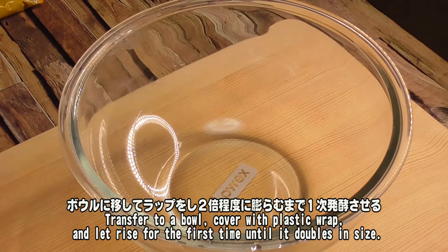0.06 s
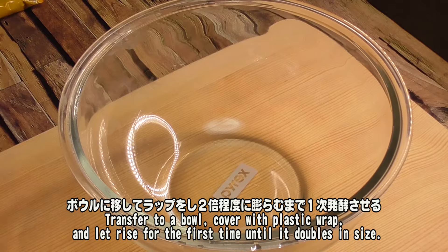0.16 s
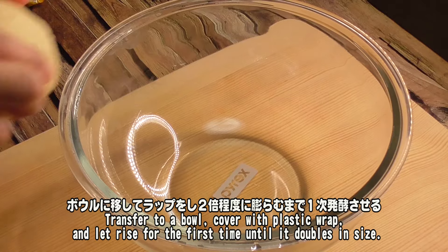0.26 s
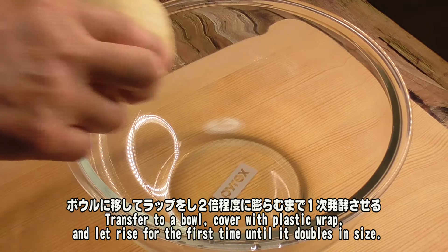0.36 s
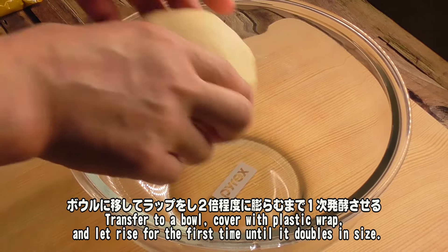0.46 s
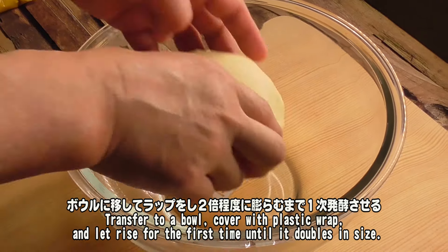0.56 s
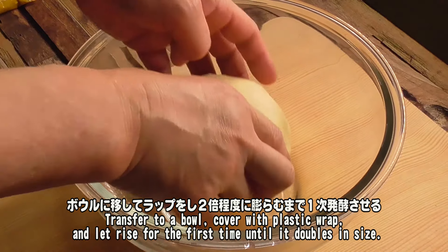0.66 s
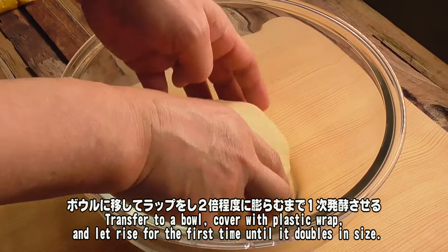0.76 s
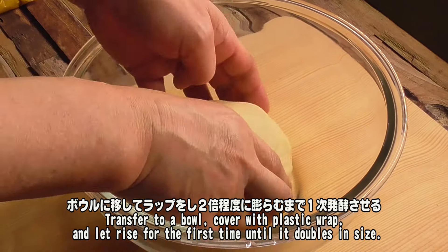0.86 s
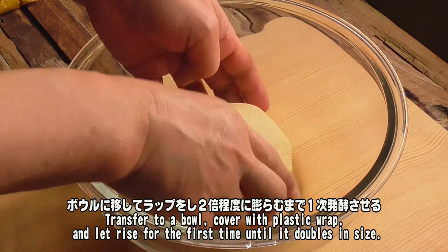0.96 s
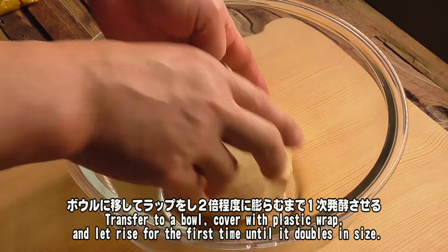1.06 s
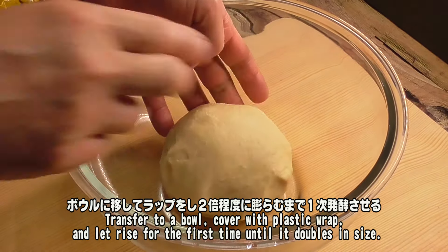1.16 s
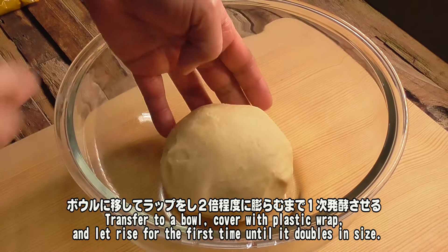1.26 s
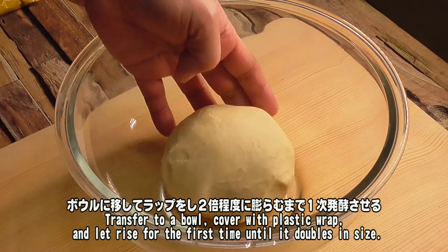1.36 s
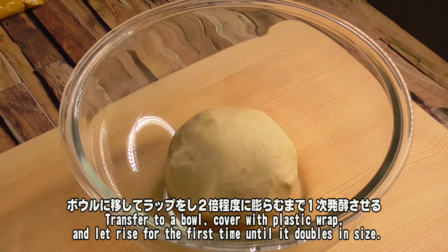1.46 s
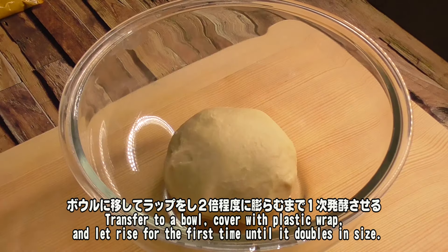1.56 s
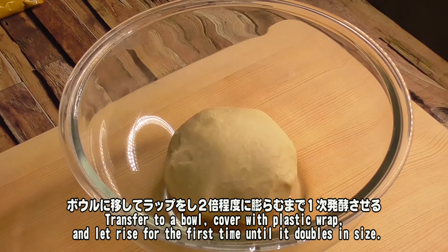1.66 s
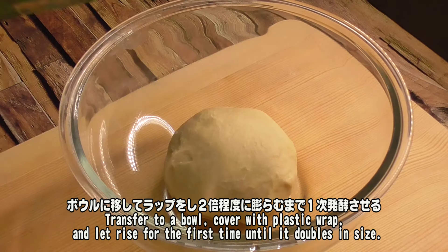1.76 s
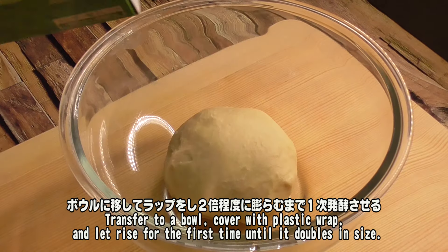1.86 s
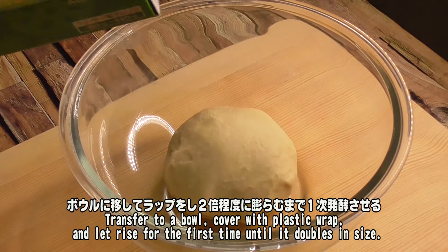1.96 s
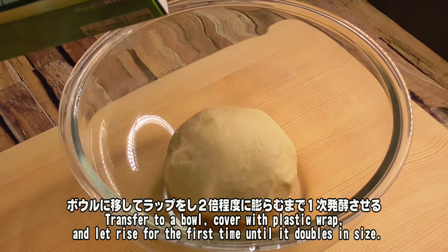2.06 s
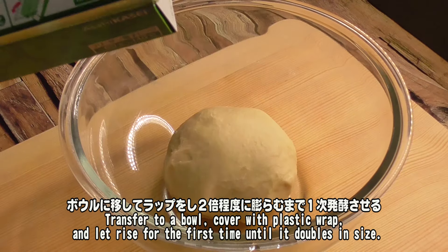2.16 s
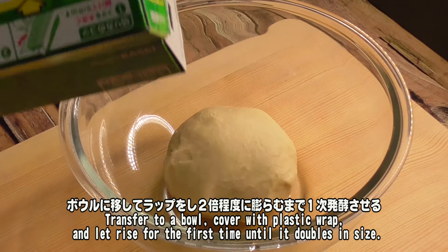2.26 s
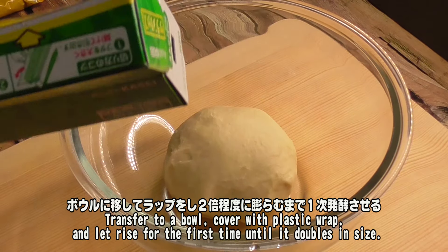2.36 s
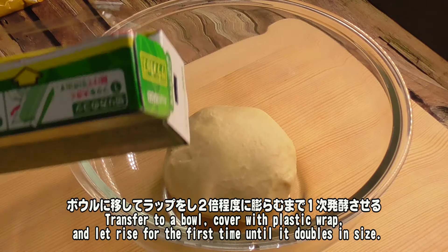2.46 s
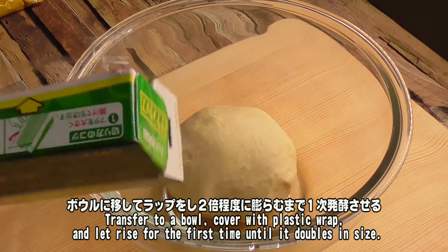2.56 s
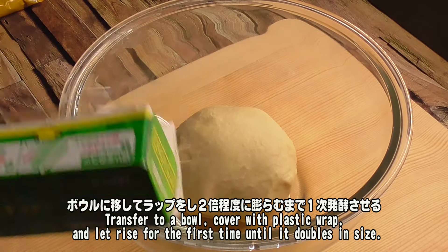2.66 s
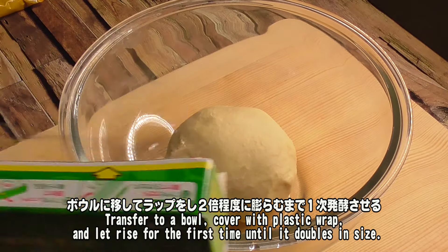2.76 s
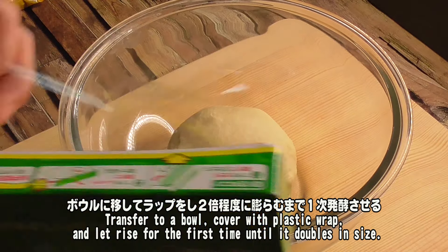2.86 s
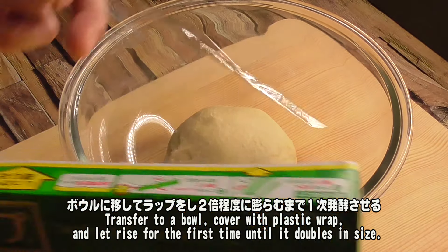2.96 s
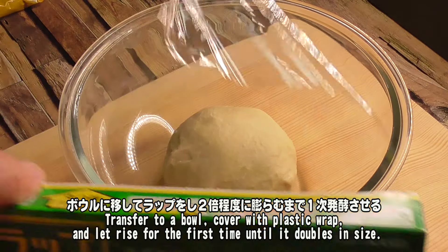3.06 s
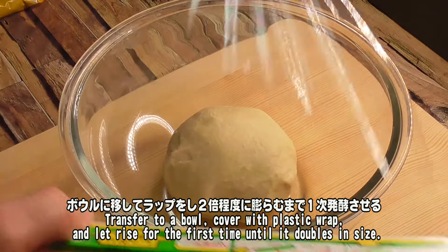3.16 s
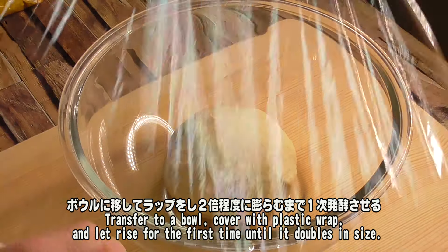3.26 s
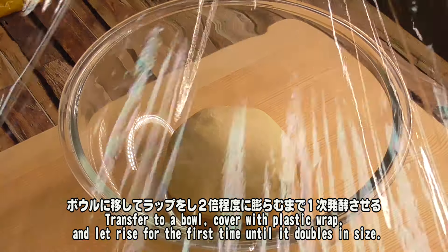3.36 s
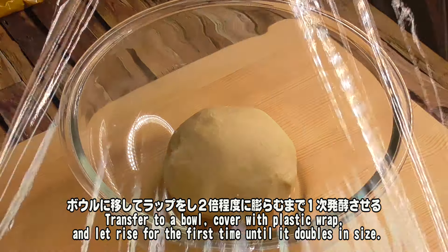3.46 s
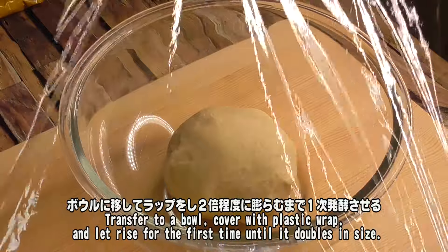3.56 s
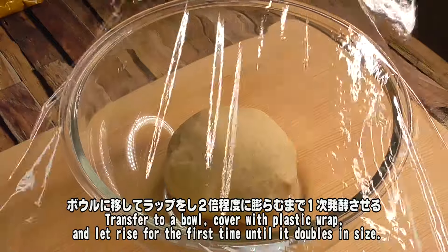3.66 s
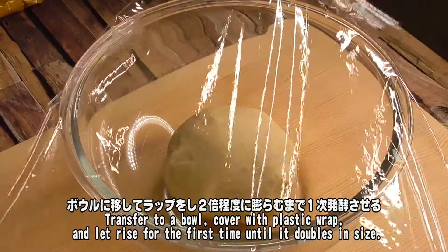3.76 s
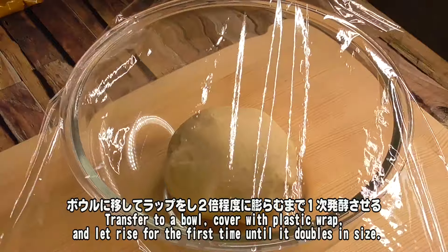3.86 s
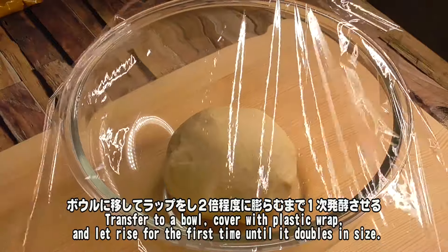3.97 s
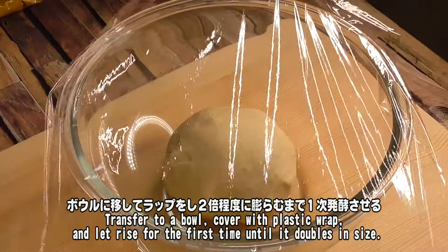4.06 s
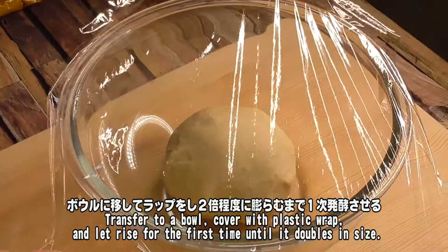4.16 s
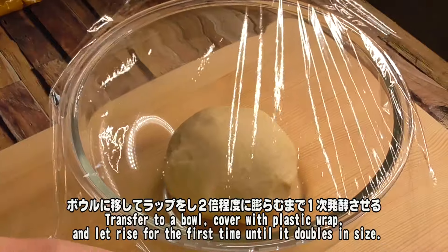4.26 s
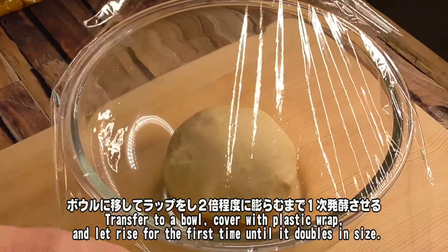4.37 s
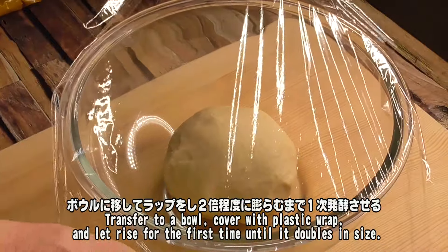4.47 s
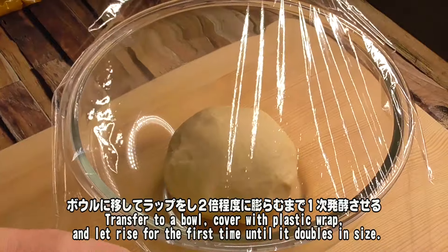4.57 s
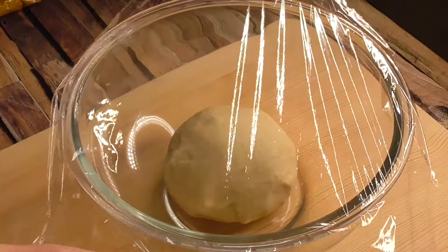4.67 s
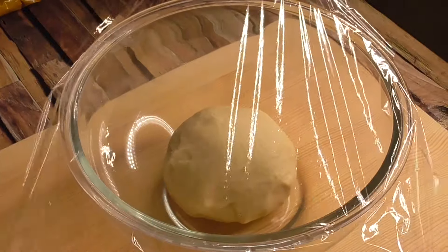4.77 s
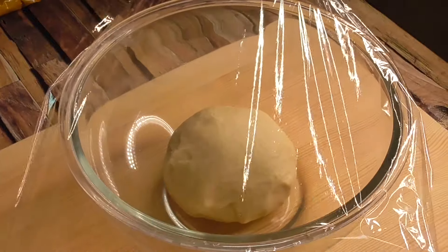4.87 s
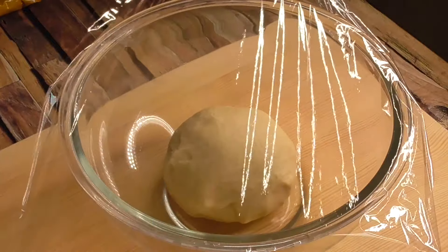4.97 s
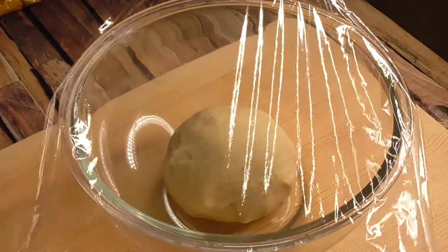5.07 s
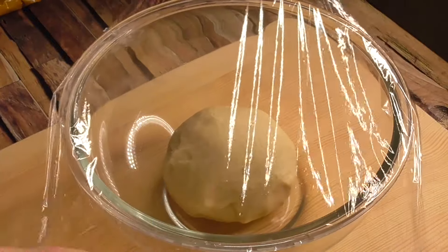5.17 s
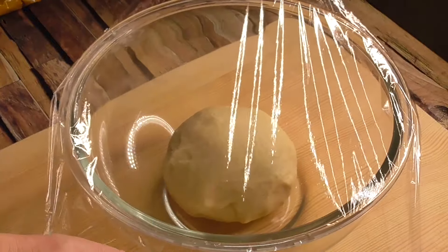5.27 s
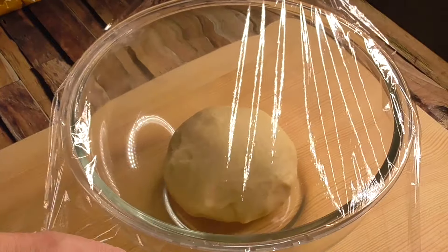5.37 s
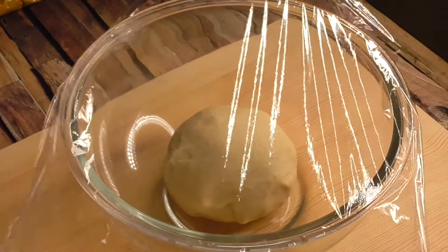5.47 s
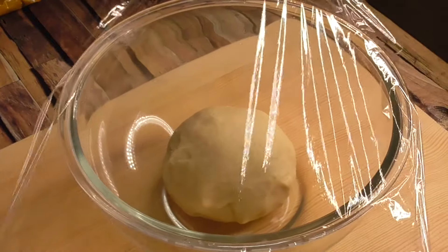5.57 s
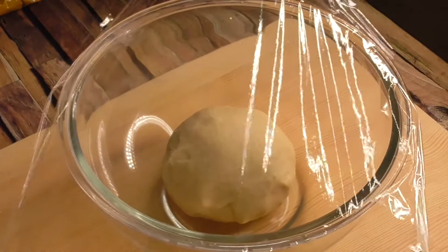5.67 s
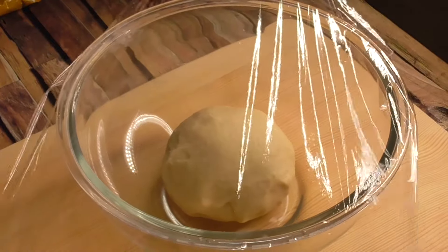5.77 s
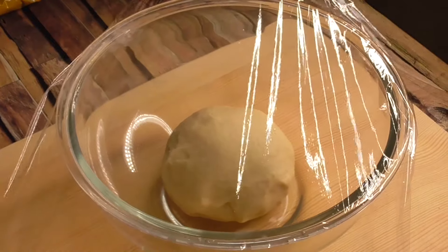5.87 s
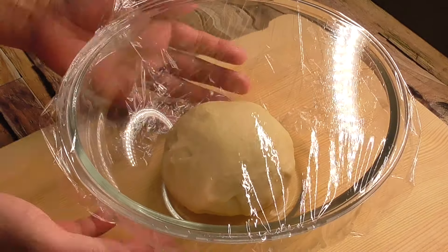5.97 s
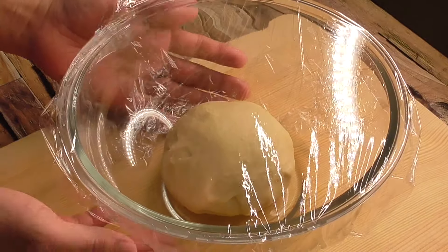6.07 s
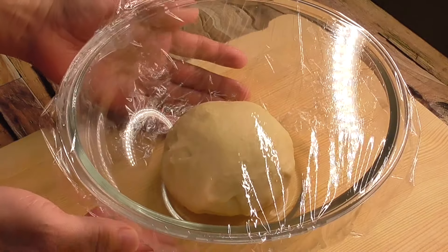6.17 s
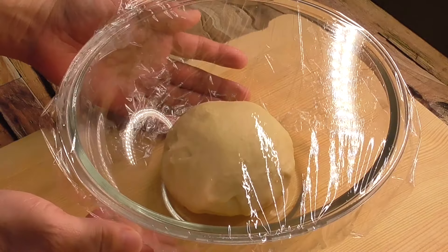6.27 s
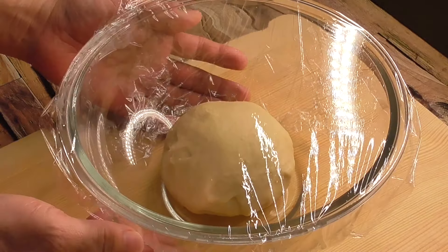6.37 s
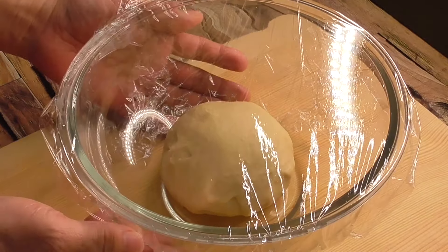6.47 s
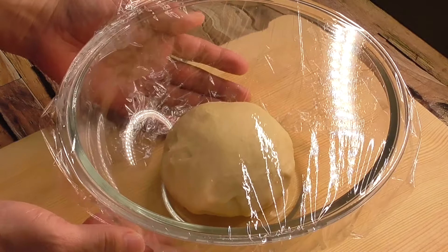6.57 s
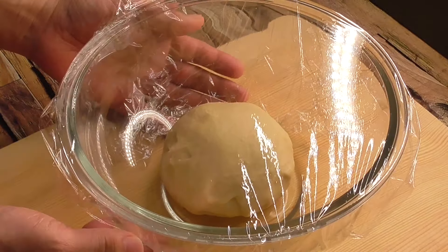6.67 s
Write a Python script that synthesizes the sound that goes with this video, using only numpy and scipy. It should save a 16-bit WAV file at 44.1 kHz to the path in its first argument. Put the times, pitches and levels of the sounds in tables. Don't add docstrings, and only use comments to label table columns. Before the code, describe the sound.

In a quiet kitchen, a faint motor tick, then cling film crackles off a cardboard box and snaps tight over a glass bowl.

```python
import sys
import numpy as np
from scipy import signal
from scipy.io import wavfile

SR = 44100
rng = np.random.default_rng(int(sys.argv[2]) if len(sys.argv) > 2 else 0)


def how_loud(loudness_db):
    steps = np.asarray(loudness_db, float) / 20
    return 10 ** steps


def master(y):
    cut = np.clip(np.atleast_2d(y).T, -1, 1)
    pcm = np.round(cut * 32767)
    wavfile.write(sys.argv[1], SR, pcm.astype(np.int16))


N = 296098
PRESSED_FROM_S = 3.58

# centre f/Hz, width f/Hz, level/dB
HOLLOW = [(775, 315, -1), (980, 79.9, 1), (1156, 402, 2.5), (1589.6, 454, 0.5), (2278.3, 83, -8)]
# centre f/Hz, width f/Hz, level/dB
BOARD = [(150, 60, -5), (280, 212.7, 3), (380, 38, 3), (425.2, 123, 1.5), (651.6, 109, 0.5)]


def rms_one(x):
    return x / np.sqrt(np.mean(x ** 2) + 1e-20)


def in_time(rows):
    s, *columns = np.transpose(rows)
    return [np.interp(np.arange(N) / SR, s, c) for c in columns]


def at_hz(points, hz):
    f, value = np.array(points).T
    return np.interp(np.log(hz), np.log(f), value)


def drift(rate_hz):
    r = np.exp(-80 * np.pi * rate_hz / SR)
    noise = rng.standard_normal(N // 40 + 2002)
    slow = signal.lfilter([1], [1, -2 * r, r * r], noise)[2000:]
    return np.interp(np.arange(N) / 40, np.arange(len(slow)), rms_one(slow))


def bandpass(x, low_hz, high_hz):
    return signal.sosfilt(signal.butter(2, [low_hz, high_hz], "band", fs=SR, output="sos"), x)


def resonance(x, hz, width_hz):
    r = np.exp(-np.pi * width_hz / SR)
    gain = (1 - r * r) / 2
    return signal.lfilter([gain, 0, -gain], [1, -2 * r * np.cos(2 * np.pi * hz / SR), r * r], x + 1e-18)


def body(x, modes):
    out = 0
    for k, (hz, width_hz, db) in enumerate(modes):
        out = out + (-1) ** k * how_loud(db) / np.sqrt(width_hz) * resonance(x, hz, width_hz)
    return out


def sides(pan_db):
    return how_loud(np.array([pan_db, -pan_db]) / 2)


def clicks(per_s, size_db, clump_db, spread_db):
    per_s = np.clip(per_s, 100, SR / 2)
    sizes = how_loud(size_db * np.minimum(rng.exponential(1, N), 5)) * rng.choice([-1, 1], N)
    born = rng.random(N) < per_s * how_loud(clump_db * drift(25)) / SR
    return sides(spread_db * rng.standard_normal(N)) * rms_one(sizes) * born * np.sqrt(SR / per_s)


def spaced(x, lag):
    at = np.flatnonzero(x[1])
    right = np.zeros(N)
    np.add.at(right, np.clip(at + np.round(lag[at]).astype(int), 0, N - 1), x[1, at])
    return np.array([x[0], right])


def add(out, s, sound):
    i = round(s * SR)
    out[:, i:i + sound.shape[1]] += sound[:, :N - i]


def gestures(rows, rest_db):
    t, power = np.arange(N) / SR, how_loud(2 * rest_db)
    for s, swell, hold, level_db, fade in rows:
        fading = np.maximum(t - s - swell - hold, 0) / fade
        rise = np.clip((t - s) / swell, 0, 1)
        power = power + (rise * how_loud(level_db - 20 * fading)) ** 2
    return 10 * np.log10(power)


def hum():
    # f/Hz, level/dB
    hum_tone = [(12, -56), (20, -22), (139, -7.5), (179, -3), (237, -10), (281, -2), (323, -13.5),
                (479, -11), (652, -14), (863, -11.5), (2060, -25.5), (2510, -25.5), (6170, -26.5),
                (15200, -24), (16500, -46)]
    # f/Hz, correlation
    likeness = [(60, 0.47), (240, 0.366), (950, 0.087), (3770, 0.14), (15000, 0.052)]
    out, edges = 0, 20 * 2 ** np.arange(0, 10, .4)
    white = rng.standard_normal((2, 2, N))
    for k, (low, high) in enumerate(zip(edges, edges[1:])):
        mid, side = bandpass(white[k % 2], low, min(high, .45 * SR))
        hz = np.sqrt(low * high)
        alike = np.clip(at_hz(likeness, hz), -1, 1)
        stereo = np.sqrt(1 + alike) * mid + np.sqrt(1 - alike) * side * [[1], [-1]]
        out = out + how_loud(at_hz(hum_tone, hz)) * stereo
    return how_loud(-57.5) * rms_one(out)


def motor():
    # t/s, level/dB
    motor_level = [
        (.54, -81.5),
        (.6, -67.5),
        (.72, -67),
        (.9, -69.5),
        (1.1, -70.5),
        (1.33, -67.5),
        (1.46, -73),
        (1.47, -95),
    ]
    # centre f/Hz, width f/Hz, level/dB
    housing = [(2330, 620, 3), (3930, 166, 0.5), (4750, 310, -3.5), (5800, 300, -23.5)]
    steps_per_s, first_s = 59.9, .5502
    at = np.arange(first_s, motor_level[-1][0], 1 / steps_per_s)
    steps = np.zeros(N)
    steps[(at * SR).astype(int)] = how_loud(2.0 * rng.standard_normal(len(at)))
    decay = np.exp(-1 / (0.0061 * SR))
    scratch = signal.lfilter([1], [1, -decay], steps + 1e-18) * rng.standard_normal((2, N))
    whine = 0.24 * resonance(rng.standard_normal(N), 3920, 140)
    started = steps.cumsum() > 0
    ring = rms_one(body(scratch[0] + 0.58 * scratch, housing)) + 5.7 * whine * started
    return how_loud(in_time(motor_level)[0] - 6.0) * rms_one(ring)


def kitchen(x):
    # band f/Hz, t60/s, level/dB
    echoes = [(199.2, 0.285, -17.5), (508.2, 0.1794, -10.5), (1200, 0.456, -14), (2227, 0.533, -16.5),
              (5000, .3, -16), (11000, .2, -20)]
    t, tail = np.arange(SR // 2) / SR, 0
    for hz, t60, level_db in echoes:
        shared, own = rng.standard_normal(len(t)), rng.standard_normal((2, len(t)))
        noise = bandpass(2.072 * shared + 1.768 * own, hz / 1.585, hz * 1.762)
        dying = how_loud(-60 * t / t60) * np.clip(t / 0.001258 - 1, 0, 1)
        tail = tail + how_loud(level_db) * noise * dying / np.sqrt(np.sum(dying ** 2))
    return signal.fftconvolve(x.mean(axis=0)[None], tail, axes=1)[:, :N]


def rustle(modes, level_db, per_s, flicker_db):
    train = clicks(np.full(N, per_s), size_db=2.5, clump_db=2.0, spread_db=3.0)
    return how_loud(level_db + flicker_db * drift(18.2)) * rms_one(body(body(train, modes), modes))


def board_rumble(grip_db):
    return rustle(BOARD, -52.5 + 0.689 * (grip_db + 49.5), per_s=1500, flicker_db=2.0)


def box_boom(grip_db):
    # centre f/Hz, width f/Hz, level/dB
    belly = [(126.2, 71, 0.5), (180.1, 62, -2.5)]
    held = np.clip((PRESSED_FROM_S - np.arange(N) / SR) / .05, 0, 1)
    return held * rustle(belly, -58 + .55 * (grip_db + 50), per_s=600, flicker_db=3.0)


def hollow_rustle(grip_db):
    return rustle(HOLLOW, grip_db, per_s=4000, flicker_db=1.5)


def knocks():
    # t/s, peak level/dB, pitch f/Hz
    hollow_knocks = [(1.4961, -17.5, 1276), (1.5117, -24, 1130), (1.954, -23.5, 973), (2.33, -15.5, 2224),
                     (2.33, -18.5, 1133), (2.6272, -25, 1461), (2.6804, -26.5, 994), (2.7188, -11.5, 982.5),
                     (2.8346, -28, 875), (2.9932, -20, 1278), (3.0521, -11, 993.7), (3.5802, -33, 1068),
                     (3.6721, -31.5, 830), (3.78, -32.5, 734), (4.4674, -31, 991), (4.605, -36, 1410),
                     (4.6255, -22.5, 878.6), (4.9339, -30, 1272), (4.989, -30.5, 1178), (5.0065, -25, 1212),
                     (5.0337, -30.5, 1026), (5.066, -22.5, 1321), (5.1307, -31, 640.4), (5.5233, -36, 983),
                     (5.5929, -12.5, 980), (5.6606, -22.5, 957), (5.794, -13, 1246), (5.8446, -22.5, 1021),
                     (5.9126, -20.5, 1279)]
    # t/s, peak level/dB, pitch f/Hz
    thuds = [(1.9664, -36, 390), (2.1001, -39, 130), (2.1816, -36.5, 280), (2.3331, -25, 330),
             (2.6303, -32.5, 315), (2.6802, -32.5, 315), (2.718, -25.5, 450), (2.7677, -27, 380),
             (2.947, -34.5, 346), (2.9974, -25.5, 413), (3.171, -32.5, 313), (4.6275, -31.5, 392),
             (4.8434, -36, 459), (5.0072, -30, 426), (5.0671, -34, 427), (5.5883, -26.5, 310),
             (5.7928, -23.5, 280), (5.9114, -19.5, 291.7)]
    # t/s, peak level/dB, pitch f/Hz, ring t60/s
    bumps = [(.128, -44.5, 828, .02), (0.141, -54.5, 71, 0.076), (.84, -43.5, 620, 0.049),
             (0.848, -60, 70, 0.079), (1.47, -33.5, 682, 0.0074), (1.491, -44.5, 127, 0.085),
             (1.709, -32, 1930, 0.0126), (1.954, -26.5, 2140, 0.026), (2.014, -31, 251.6, 0.06),
             (2.035, -36, 280, 0.042), (2.096, -35, 1956, 0.022), (2.335, -27, 1200, 0.52),
             (2.33, -22.5, 4384, .1), (2.334, -30.5, 2253, .3), (4.83, -42, 328, 0.041),
             (4.999, -49.5, 91.3, 0.089), (2.969, -46.5, 66, 0.22), (5.589, -46.5, 92.5, 0.024),
             (5.794, -39.5, 80.4, 0.032), (5.919, -46, 65.7, 0.19)]
    knock_cycles, thud_cycles = 28.2, 12.8
    rows = [(s, db, hz, knock_cycles / hz) for s, db, hz in hollow_knocks]
    rows += [(s, db, hz, thud_cycles / hz) for s, db, hz in thuds]
    rows += bumps
    out, t = np.zeros((2, N)), np.arange(6000) / SR
    for s, peak_db, hz, t60 in rows:
        blow = rng.standard_normal(len(t)) * np.exp(-t * hz / 1.9)
        blow = bandpass(blow, 0.584 * hz, 1.716 * hz)
        own = rms_one(resonance(blow, hz, 1.793 / max(t60, .004)))
        stirred = rms_one(body(blow, HOLLOW + BOARD))
        knock = own + .5 * stirred + 0.856 * rms_one(blow)
        add(out, s, np.ones((2, 1)) * how_loud(peak_db) * knock / np.abs(knock).max())
    return out


def crackle(per_s):
    # f/Hz, level/dB
    film_tone = [(1000, -38), (1700, -11.5), (2560, -17), (4750, -6), (5800, -13.5), (8810, -7),
                 (10800, -15), (15000, -15.5), (16000, -87), (16500, -46)]
    train = clicks(per_s, size_db=2.2, clump_db=1.5, spread_db=4.0)
    train = spaced(train, 1.2 * rng.standard_normal(N))
    patch = rng.integers(0, 16, N // 2 + 1).repeat(2)[:N]
    out = 0
    for k, hz in enumerate(np.geomspace(1900, 15000, num=16)):
        patchy = how_loud(at_hz(film_tone, hz) + 1.5 * drift(5.14) + 0.58 * drift(22.5))
        out = out + patchy * resonance(train * (patch == k), hz, 0.126 * hz)
    return rms_one(out)


def film(tilt_db):
    # start t/s, swell t/s, hold t/s, crackle level/dB, 20 dB fade t/s
    pulls = [(-.05, 0.174, .005, -55.5, 0.02), (1.468, .003, 0.00196, -40, 0.0552),
             (1.47, 0.031, 0.173, -50.5, 0.19), (1.64, 0.0915, 0.0048, -46, 0.1825),
             (1.948, 0.0051, 0.00203, -41.5, 0.2636), (2.327, .005, 0.0021, -41.5, 0.35),
             (2.468, 0.0492, 0.088, -38.5, 0.14), (2.66, 0.023, 0.062, -53.5, 0.84),
             (2.06, 0.037, 0.101, -53.5, 0.31), (2.822, 0.0107, .007, -34, .012),
             (2.83, .05, .03, -45, 0.48), (2.92, 0.1925, 0.4265, -34.5, 0.1108)]
    # start t/s, swell t/s, hold t/s, level/dB, 20 dB fade t/s
    presses = [(3.621, 0.1664, 0.0047, -44.5, 0.235), (3.897, 0.2275, 0.0051, -48.5, 0.21),
               (4.199, 0.083, 0.0049, -51, 0.32), (4.457, 0.0078, 0.094, -51, 0.35),
               (4.591, 0.046, .005, -45, .25), (4.779, 0.0477, 0.0043, -41, 0.0961),
               (4.896, 0.032, 0.0046, -39, .14), (4.975, 0.0343, 0.0052, -37.5, 0.255),
               (5.303, 0.111, 0.125, -60, 0.07), (5.53, .05, .005, -43, 0.2373),
               (5.573, .022, 0.1406, -35, .25), (5.84, .006, .05, -35.5, .15),
               (6.038, 0.0303, 0.0046, -44.5, 0.1245), (6.14, 0.033, 0.109, -54, 0.2963),
               (6.25, 0.0983, 0.0046, -47, 0.1618), (6.667, .024, .002, -54.5, -0.17)]
    level_db = gestures(pulls + presses, rest_db=-74)
    x = crackle(per_s=6000 * how_loud(.8 * (level_db + 50)))
    lone = clicks(np.full(N, 260.), size_db=3.5, clump_db=4.0, spread_db=3.0)
    lone = bandpass(lone + 1e-18, 3500, 11000)
    pressed = np.arange(N) > PRESSED_FROM_S * SR
    x = x + 0.409 * rms_one(lone) * pressed
    low = signal.sosfilt(signal.butter(2, 7000, fs=SR, output="sos"), x)
    return how_loud(level_db) * (low + how_loud(tilt_db) * (x - low))


def snaps():
    # t/s, peak level/dB, centre f/Hz
    crease_snaps = [(.1285, -41.5, 5500), (.843, -34.5, 4180), (1.471, -37.5, 5950), (1.955, -20.5, 6430),
                    (2.2343, -34.5, 8730), (2.3285, -15.5, 5360), (2.3321, -11.5, 4960), (2.4847, -25, 3940),
                    (2.4918, -27, 4140), (2.6296, -28.5, 3100), (2.717, -34, 2570), (6.337, -37, 4400),
                    (2.822, -25.5, 6180), (2.991, -23, 3780), (6.0684, -32.5, 4260), (6.0773, -30.5, 4180),
                    (6.1682, -30.5, 7380), (6.684, -32.5, 5060),
                    (3.7433, -28.5, 6500), (3.7486, -30, 4920), (3.9859, -30.5, 7560), (4.0656, -31.5, 7420),
                   (4.0783, -30, 8050), (4.1386, -29, 4830), (4.1869, -31.5, 8050), (4.2309, -27, 10240),
                   (4.244, -31.5, 10750), (4.2801, -26, 8200), (4.2867, -24.5, 8640), (4.3244, -28.5, 8700),
                   (4.3633, -32.5, 9330), (4.4677, -23, 9300), (4.5242, -29, 4410), (4.536, -25.5, 6480),
                   (4.6045, -22, 7800), (4.6268, -16.5, 7240), (4.6939, -21, 7980), (4.8186, -31.5, 6210),
                   (4.8288, -25.5, 6810), (4.8392, -31, 6970), (4.914, -25, 5220)]
    # t/s, peak level/dB
    rim_snaps = [(4.923, -21), (4.934, -12.5), (4.9876, -13.5), (4.9983, -15.5), (5.005, -11),
                 (5.0661, -10.5), (5.1404, -25), (5.1749, -24), (5.199, -27), (5.247, -24.5),
                 (5.2847, -30.5), (5.469, -28), (5.4867, -31), (5.5254, -12.5), (5.548, -20.5),
                 (5.5868, -5), (5.5934, -6.5), (5.702, -23), (5.7154, -14), (5.7274, -15.5), (5.737, -23.5),
                 (5.742, -18.5), (5.7569, -15.5), (5.7767, -18), (5.7891, -19), (5.7931, -6),
                 (5.8236, -15.5), (5.8457, -16), (5.858, -16), (5.9052, -13)]
    rim_hz, rim_scatter = 7800, 0.068
    rows = crease_snaps
    rows = rows + [(s, db, rim_hz * np.exp(rim_scatter * rng.standard_normal())) for s, db in rim_snaps]
    out, t = np.zeros((2, N)), np.arange(700) / SR
    for s, peak_db, hz in rows:
        noise = rng.standard_normal((3, len(t)))
        fold = t / (.00042 * how_loud(.32 * (peak_db + 30)))
        rattle = noise[0] + 0.41 * noise[1:]
        burst = rattle * np.sqrt(fold) * np.exp(-fold)
        snap = 0.267 * bandpass(burst, 2300, 13000) + 2.63 * resonance(burst, hz, 0.455 * hz)
        add(out, s - .0003, how_loud(peak_db) * snap / np.abs(snap.mean(axis=0)).max())
    return out


def scene():
    # t/s, film tightness as top-octave tilt level/dB, pan L-R level/dB
    hands = [(0, 0.5, -.5), (1.46, -3, .2), (1.48, 0, 4.5), (1.62, -0.15, 1), (2.1, -2, 1.04),
             (2.5, -2.5, 1.1), (2.75, 4.5, 2.5), (2.86, -2.5, 1.45), (3.1, 2.5, 0.77), (3.52, -1.5, 0.14),
             (4.45, 1, .2), (5.3, 3, 0.5), (5.6, 3, -0.1), (6.07, -1.5, 1.24), (6.72, -0.4, .3)]
    # start t/s, swell t/s, hold t/s, level/dB, 20 dB fade t/s
    grips = [(1.468, .003, 0.0173, -41.5, 0.0348), (1.49, 0.0079, 0.0078, -38.5, 0.17),
             (1.67, 0.0735, .005, -49.5, 0.1358), (1.948, 0.0066, .002, -43, 0.16),
             (2.226, 0.0083, .005, -53.5, 0.01), (2.327, .005, 0.0019, -37, 0.1577),
             (2.468, 0.056, .005, -45, 0.4743), (2.68, .048, 0.0049, -40, 0.17),
             (2.9, 0.1712, 0.3815, -43.5, 0.18), (3.6, 0.0297, 0.636, -57, 0.46),
             (3.71, 0.075, 0.0049, -50, 0.2653), (4.462, 0.00835, 0.0048, -52.5, 0.31),
             (4.59, 0.05, 0.0049, -46.5, 0.19), (4.78, 0.047, .005, -50.5, 0.1),
             (4.895, 0.0375, 0.0047, -44.5, 0.0756), (4.975, 0.0306, .005, -49, 0.36),
             (5.37, 0.112, 0.11, -59, 0.21), (5.58, 0.0163, 0.102, -44, 0.1814),
             (5.6, 0.151, 0.0051, -40, 0.1063), (5.82, 0.055, 0.018, -41, 0.1019),
             (6.2, 0.138, .005, -69, 0.35), (6.667, .024, .002, -61, 0.05)]
    tilt_db, pan_db = in_time(hands)
    grip_db = gestures(grips, rest_db=-74)
    near = board_rumble(grip_db) + box_boom(grip_db) + hollow_rustle(grip_db)
    near = near + knocks() + film(tilt_db) + snaps()
    near = sides(pan_db) * near
    return hum() + motor() + kitchen(near) + near


def roll_off(x):
    return signal.sosfilt(signal.butter(12, 16650, fs=SR, output="sos"), x)


def record(dry):
    x = signal.sosfilt(signal.butter(2, 45, "high", fs=SR, output="sos"), dry)
    x = signal.sosfilt(signal.cheby2(8, 40, 16500, fs=SR, output="sos"), x)
    left = signal.sosfilt(signal.butter(1, 14000, fs=SR, output="sos"), x[0])
    return roll_off(np.array([left, x[1]]))


dry = scene()
out = record(dry)
master(out)
```